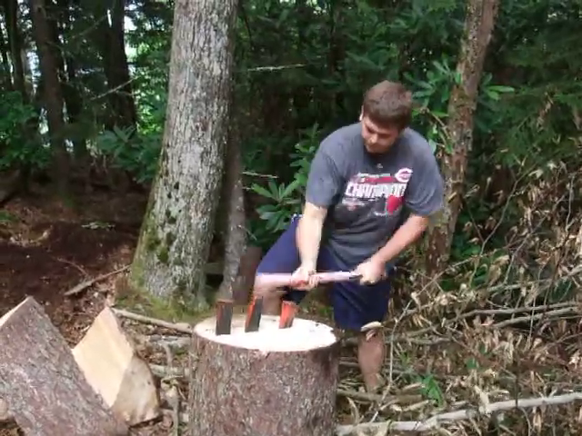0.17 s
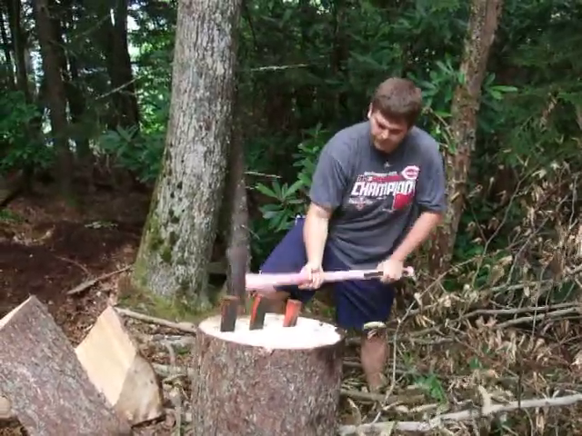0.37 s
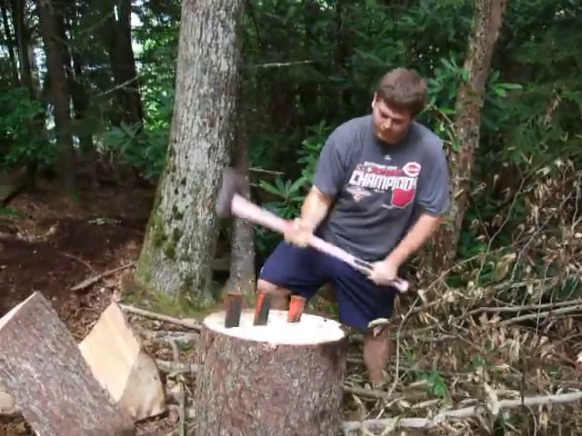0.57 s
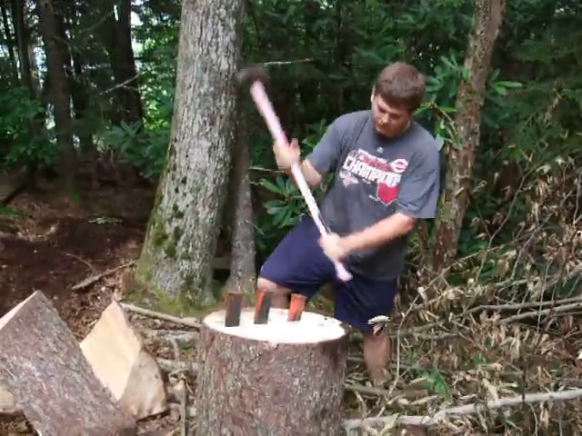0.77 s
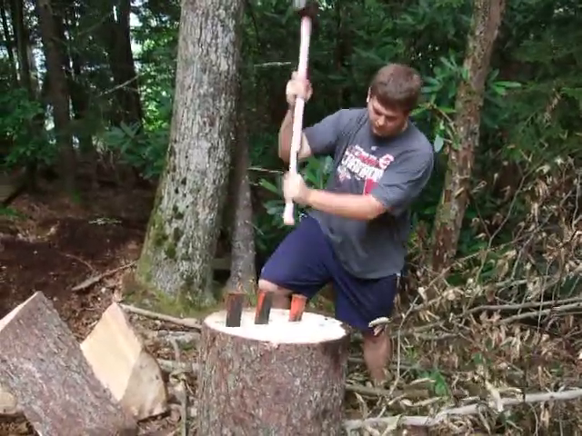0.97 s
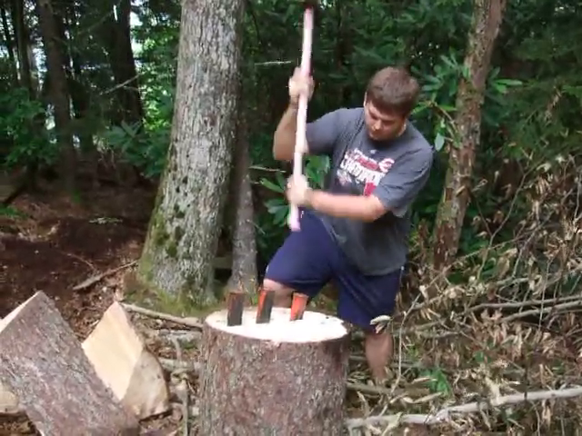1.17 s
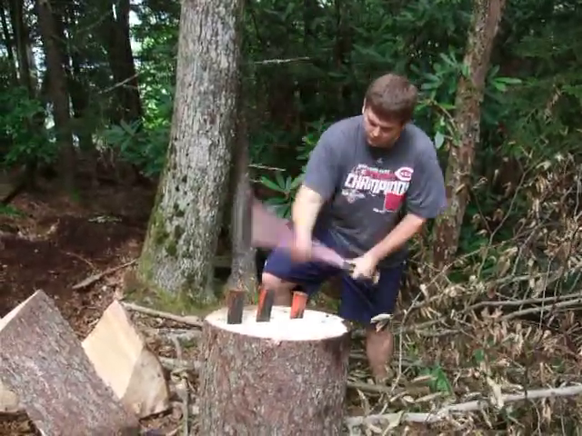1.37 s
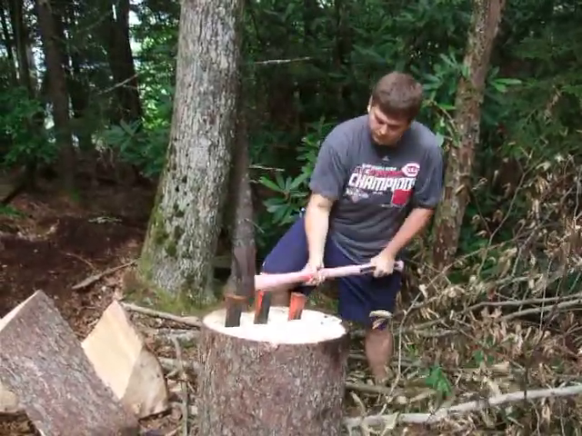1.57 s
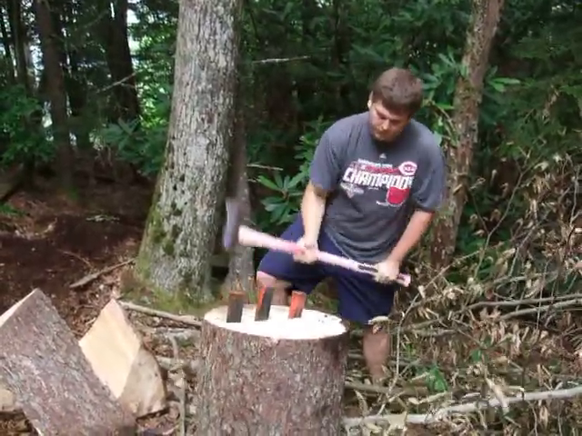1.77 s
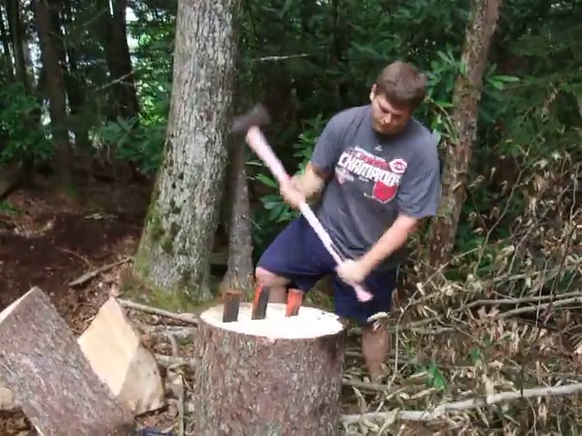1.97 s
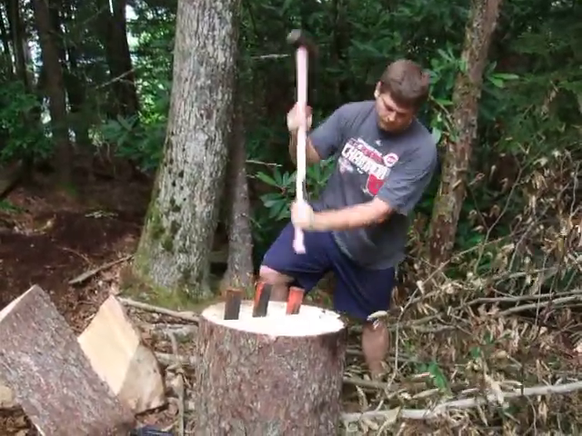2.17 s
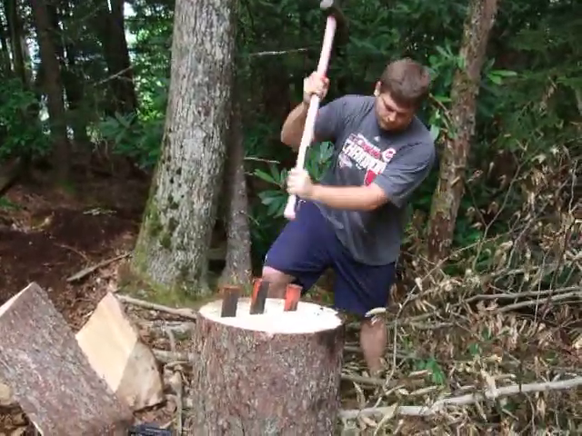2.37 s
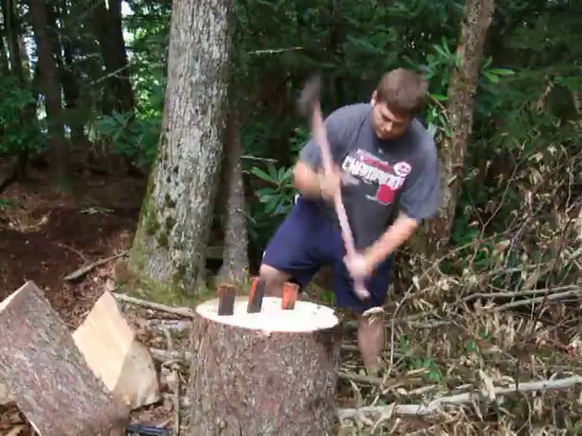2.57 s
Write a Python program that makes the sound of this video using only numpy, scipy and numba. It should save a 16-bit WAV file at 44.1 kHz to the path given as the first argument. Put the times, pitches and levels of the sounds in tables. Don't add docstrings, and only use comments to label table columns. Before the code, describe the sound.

Sledge hammer on steel wedges in a log, outdoors in woods. Faint leaf and camera hiss, then a bright, glancing clink at 0.2 s with short ring. A loose piece knocks woodenly from 0.33 to 0.65 s, hardest near 0.57. Small twig ticks throughout. A square, lower clink at 1.45 s swells back off trunks, fading into hiss until about 2.6 s. Dull, overloaded mono microphone.

```python
import sys
import numpy as np
from scipy import signal
from scipy.fft import rfft, irfft
from scipy.io import wavfile
from scipy.ndimage import uniform_filter1d
from numba import njit

SR = 44100
rng = np.random.default_rng(int(sys.argv[2]) if len(sys.argv) > 2 else 0)


def generate_wav(sig):
    pcm = np.round(np.clip(np.atleast_2d(sig).T, -1, 1) * 32767).astype(np.int16)
    wavfile.write(sys.argv[1], SR, pcm)


def volts_from_decibels(level):
    exponent = np.asarray(level, float) / 20
    return 10 ** exponent


N = 114660

# (time [s], crack sent into the wood [dB], wood echo level [dB], echo rise [s], log thump [dB])
HAMMER_BLOWS = [
    (0.2023, -5.5, -16, 0.11, -28),
    (1.4499, -2.5, -9.5, 0.073, -25.5),
]
# (time [s], level [dB], low mode [Hz], high mode [Hz], high re low mode [dB])
LOG_KNOCKS = [(.334, -20, 205, 324, -14), (0.4599, -23, 1100, 5050, 19.5), (0.4621, -7, 1840, 4220, 3.5),
              (.470, -27.5, 1760, 4064, 13.5), (0.4896, -18, 2020, 4700, 8.5), (.502, -35, 2240, 4970, -13),
              (0.516, -25.5, 1580, 3300, 4), (0.5293, -9, 2395, 3440, 6.5), (0.5304, -4, 784, 1770, 4),
              (0.5345, -13.5, 1780, 3463, -3), (0.535, -18.5, 317, 530, -4.5), (.5725, -13, 800, 1200, -6),
              (0.623, -15, 2500, 5200, 2), (0.6316, -16, 874, 4860, 16), (.6355, -5.5, 2536, 4390, 0.5),
              (0.636, -3.5, 820, 4177, 3), (.641, -44, 768, 1936, -4), (.645, -18, 450, 910, 3),
              (.737, -45, 796, 2040, -5)]


def fade(t, t60, rise):
    t = np.maximum(t, 0)
    return (1 - np.exp(-(t / rise) ** 2)) * volts_from_decibels(-60 * t / t60)


def sine(hz, t):
    return np.sin(2 * np.pi * hz * t)


def band(x, hz, width):
    edges_hz = [hz / (1 + width), hz * (1 + width)]
    return signal.sosfilt(signal.butter(1, edges_hz, "band", fs=SR, output="sos"), x)


def add(track, s, sound):
    i = int(s * SR)
    track[i:i + len(sound)] += sound[:N - i]


def slow_walk(size):
    held = np.repeat(rng.standard_normal(N // size + 1), size)
    return 1.3 * uniform_filter1d(uniform_filter1d(held, size), size)[:N]


def air():
    # (frequency [Hz], level per Hz [dB])
    noise_colour = [(15, -43), (25, -2.5), (70, -2.5), (145, -4.5), (267, -4), (403, -4), (2230, -7),
                    (4410, -3), (5800, -12), (7540, -30.5), (12800, -120)]
    level_db = -50.5
    hz = np.fft.rfftfreq(N, 1 / SR) + 1
    colour_hz, colour_db = np.transpose(noise_colour)
    colour = volts_from_decibels(np.interp(np.log(hz), np.log(colour_hz), colour_db))
    common = slow_walk(20000)
    out = np.zeros(N)
    for octave in range(4, 14):
        share = np.sqrt(np.clip(1 - abs(np.log2(hz) - octave), 0, 1))
        noise = irfft(rfft(rng.standard_normal(N)) * colour * share, N)
        out += volts_from_decibels(0.4 * common + 0.6 * slow_walk(3000)) * noise
    return volts_from_decibels(level_db) * out / np.std(out)


def deep_thuds():
    hz, level_db, t60_s = 70, -41, 0.098
    out, t = np.zeros(N), np.arange(SR // 4) / SR
    thud = volts_from_decibels(level_db) * fade(t, t60_s, 0.002) * np.cos(2 * np.pi * hz * t)
    for event in [*HAMMER_BLOWS, LOG_KNOCKS[0]]:
        add(out, event[0], thud)
    return out


def ticks():
    # (time [s], peak level [dB], bright band [Hz])
    twig_ticks = [(0.059, -46, 3930), (0.099, -43.5, 4500), (0.901, -31.5, 4100), (0.968, -34, 2740),
                  (1.197, -29, 5200), (1.33, -45, 4620), (1.895, -33.5, 4170), (2.091, -42, 5060),
                  (2.177, -39, 4700), (2.338, -40, 4420), (2.352, -49, 5100), (2.459, -44, 4340),
                  (2.556, -32, 5000)]
    t60_s, bright_db = 0.039, 0.5
    out, t = np.zeros(N), np.arange(SR // 16) / SR
    for s, db, hz in twig_ticks:
        noise = rng.standard_normal((2, len(t)))
        snap = band(noise[0], 3500, 3.4) + volts_from_decibels(bright_db) * 1.32 * band(noise[1], hz, 0.23)
        add(out, s, volts_from_decibels(db) * fade(t, t60_s, 0.00024) * snap)
    return out


def wood(rise):
    split_hz, t60_low_s, t60_high_s = 780, 0.78, 0.78
    clearing_db, trunks_db = -14.5, 2
    t = np.arange(SR) / SR
    uneven = np.repeat(rng.standard_normal(SR // 100 + 1), 100)[:SR]
    grain = rng.standard_normal(SR) * volts_from_decibels(trunks_db * uneven)
    low = signal.sosfilt(signal.butter(2, split_hz, fs=SR, output="sos"), grain)
    high = grain - low
    swell = 1 - (1 - volts_from_decibels(clearing_db)) * np.exp(-(t / rise) ** 4)
    echo = swell * (low * fade(t, t60_low_s, 0.03) + high * fade(t, t60_high_s, 0.0035))
    return echo / np.sqrt(np.sum(echo ** 2))


def knocks():
    # (time [s], level [dB], low mode [Hz], high mode [Hz], high re low [dB])
    hard_knock = (.5703, 4, 1950, 4500, 0)
    cycles, grit_db = 6.83, -1
    tail_db, hard_tail_db, tail_t60_s = -18.5, -10, 0.094
    wood_db, wood_rise_s = -21.5, 0.046
    out, t = np.zeros(N), np.arange(SR // 8) / SR

    def ring(hz):
        return fade(t, cycles / hz + 0.0036, 0.00079) * sine(hz, t)

    for s, db, low_hz, high_hz, high_db in [*LOG_KNOCKS, hard_knock]:
        noise = rng.standard_normal((2, len(t)))
        modes = ring(low_hz) + volts_from_decibels(high_db) * ring(high_hz)
        grit = volts_from_decibels(grit_db) * fade(t, 0.01, 0.00025) * band(noise[0], np.sqrt(low_hz * high_hz), 1.4)
        this_tail_db = tail_db + hard_tail_db * (s == hard_knock[0])
        woody = band(band(noise[1], low_hz, 1.0), low_hz, 0.76)
        tail = volts_from_decibels(this_tail_db) * 2 * fade(t, tail_t60_s, 0.00067) * woody
        add(out, s, volts_from_decibels(db) * (modes + grit + tail))
    return out + volts_from_decibels(wood_db) * signal.fftconvolve(out, wood(wood_rise_s))[:N]


def hammer():
    # (frequency [Hz], level [dB], t60 [s])
    glancing_modes = [(584, -47, 0.086), (1020, -33, 0.019), (1645, -44, 0.039), (2210, -33.5, 0.034),
                      (2720, -20.5, 0.0083), (3430, -16.5, 0.014), (4513, 4.5, 0.0062), (5500, -36, .045),
                      (5510, -14, 0.047), (5830, -7, 0.019)]
    square_modes = [(303, -16, 0.018), (450, -20.5, 0.021), (1078, -17, 0.042), (1674, -29, .025),
                    (2197, -5.5, 0.011), (2906.4, -12.5, .035), (3111, -33, 0.078), (4153, -7, 0.015),
                    (4215, -11, .015), (4590, -9.5, 0.01), (4820, -13.5, 0.023), (5140, -13.5, 0.042),
                    (5240, -13.5, 0.032), (5810, -21, 0.013)]
    # (frequency [Hz], level [dB], t60 [s])
    clink_modes = [
        (5150, 3, .018),
        (2920, -2, .02),
    ]
    # (whole blow [dB], crack toward the camera [dB])
    blow_levels = [
        (9, -16),
        (4, -8),
    ]
    longest_rings = (.07, .04)
    # (delay [s], level [dB])
    near_faces = [
        [(.0088, -19.5), (.0148, -21)],
        [(.0055, -13), (.0445, -18), (.082, -20)],
    ]
    rise_s, crack_s, crack_hz = 0.00093, 0.00005, 1300
    grit_db, grit_t60_s = 8.5, 0.029
    thump_hz, thump_t60_s = 207, 0.057
    out, t = np.zeros(N), np.arange(SR // 4) / SR
    thump = fade(t, thump_t60_s, 0.0045) * sine(thump_hz, t)
    crack = band(2 * np.exp(-((t - 4 * crack_s) / crack_s) ** 2), crack_hz, 11.4)
    mode_sets = (glancing_modes, square_modes)
    settings = zip(HAMMER_BLOWS, blow_levels, mode_sets, clink_modes, longest_rings, near_faces)
    for event, (db, crack_db), modes, clink, longest, near in settings:
        s, far_db, wood_db, wood_rise, thump_db = event
        body = volts_from_decibels(thump_db) * thump
        for k, (hz, mode_db, t60) in enumerate(sorted([*modes, clink])):
            sign = (-1) ** k
            body = body + sign * volts_from_decibels(mode_db) * fade(t, min(t60, longest), rise_s) * sine(hz, t)
        noise = band(rng.standard_normal(len(t)), crack_hz, 0.83)
        grit = volts_from_decibels(grit_db) * fade(t, grit_t60_s, rise_s) * noise
        blow = volts_from_decibels(db) * (body + volts_from_decibels(crack_db) * (crack + grit))
        add(out, s, blow)
        for lag, near_db in near:
            add(out, s + lag, volts_from_decibels(near_db) * blow)
        toward_wood = body + volts_from_decibels(far_db) * 1.81 * crack
        add(out, s, volts_from_decibels(db + wood_db) * signal.fftconvolve(toward_wood, wood(wood_rise)))
    return out


def scene():
    bass_cut = signal.butter(3, 202, "high", fs=SR, output="sos")
    struck = signal.sosfilt(bass_cut, hammer() + knocks() + ticks())
    return np.tile(struck + deep_thuds() + air(), (2, 1))


@njit
def follow(x, attack, release):
    e, out = 0., np.empty(len(x))
    for i in range(len(x)):
        e += (abs(x[i]) - e) * (attack if abs(x[i]) > e else release)
        out[i] = e
    return out


def low_pass(x):
    return signal.sosfilt(signal.butter(12, 16680, fs=SR, output="sos"), x)


def record(dry):
    top_hz, final_hz = 5850, 13000
    limit_db, ratio, attack_s, release_s = -15, 2.5, 0.004, 0.05
    clip, knee, offset = 0.72, 8, -0.0026
    hz = np.fft.rfftfreq(N, 1 / SR)
    dull_db = -80 * np.clip((hz - top_hz + 150) / 550, 0, 1) ** 2
    x = irfft(rfft(dry[0]) * volts_from_decibels(dull_db), N)
    peak = follow(x, 1 / (attack_s * SR), 1 / (release_s * SR))
    x = x * np.minimum(volts_from_decibels(limit_db) / (peak + 1e-9), 1) ** (1 - 1 / ratio)
    x = x / (1 + abs(x / clip) ** knee) ** (1 / knee)
    x = signal.sosfiltfilt(signal.butter(2, final_hz, fs=SR, output="sos"), x)
    return low_pass(np.tile(x + offset, (2, 1)))


dry = scene()
out = record(dry)
generate_wav(out)
```